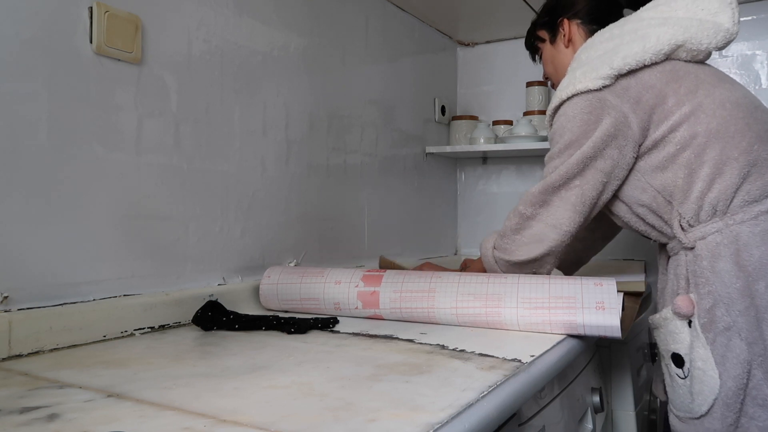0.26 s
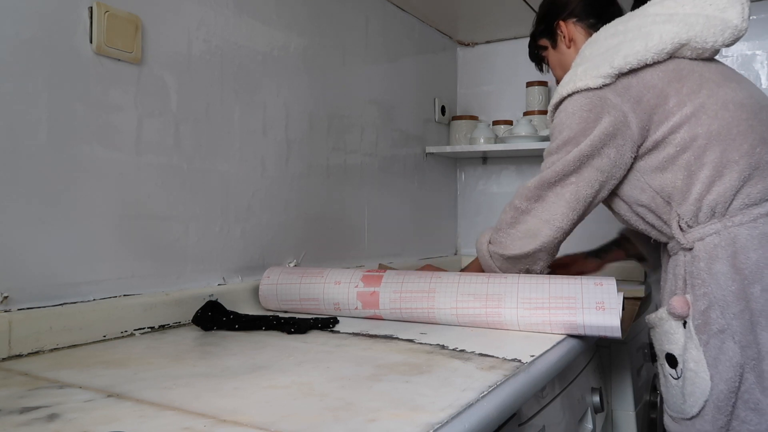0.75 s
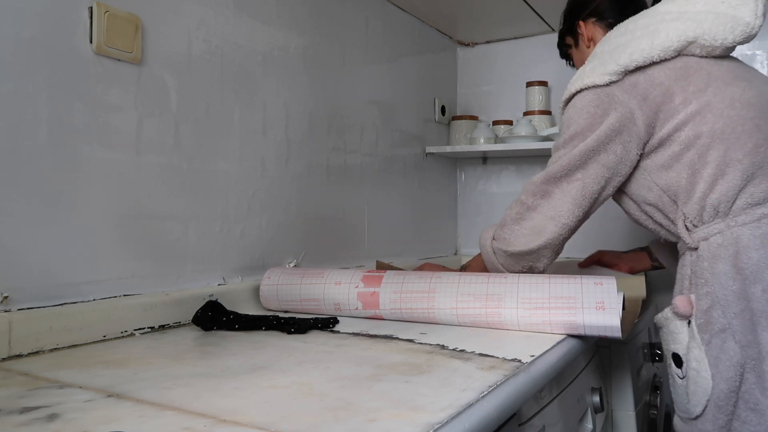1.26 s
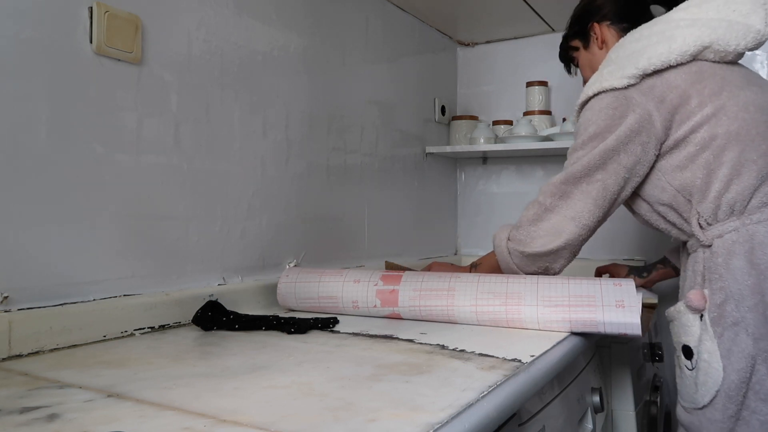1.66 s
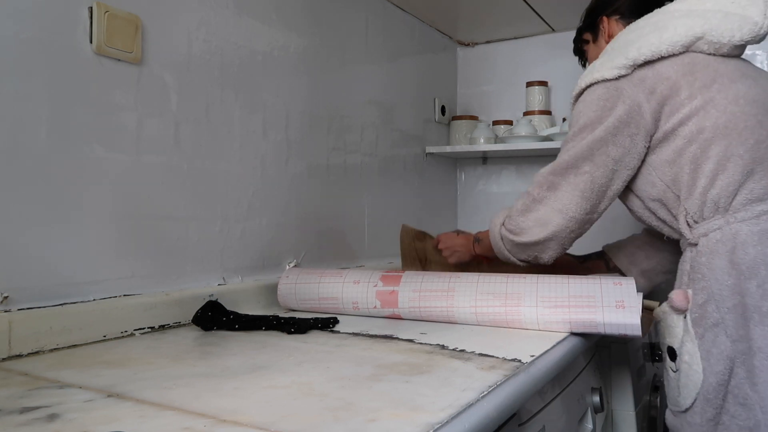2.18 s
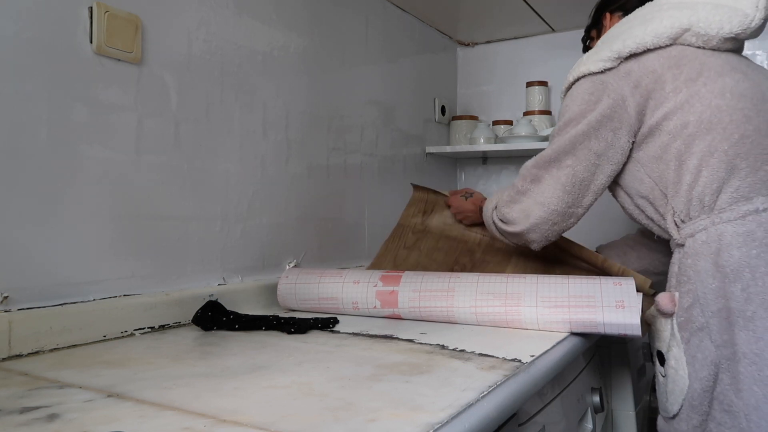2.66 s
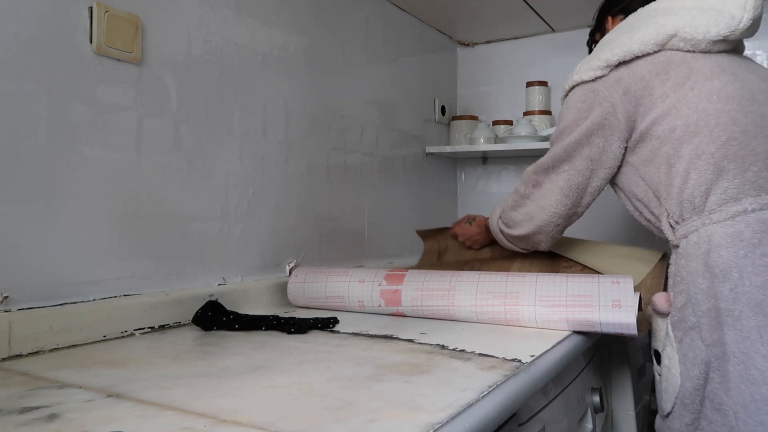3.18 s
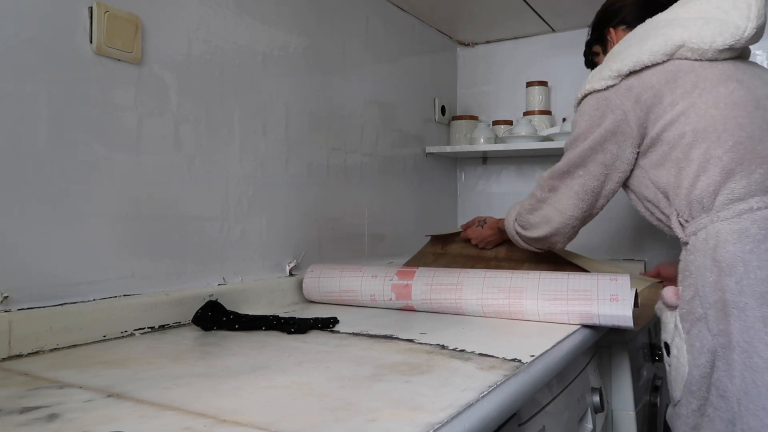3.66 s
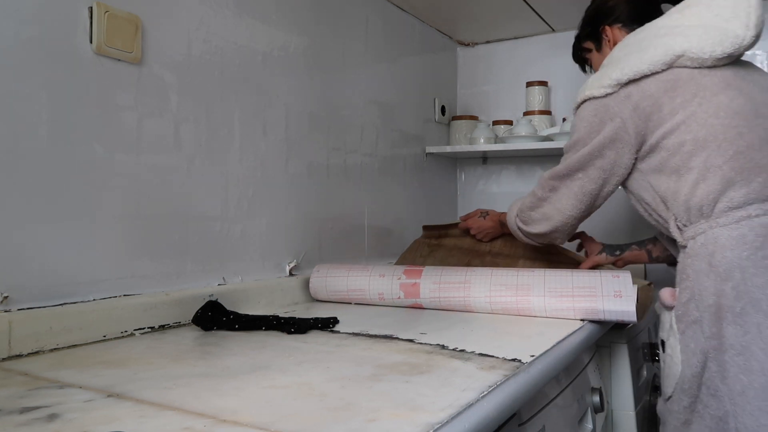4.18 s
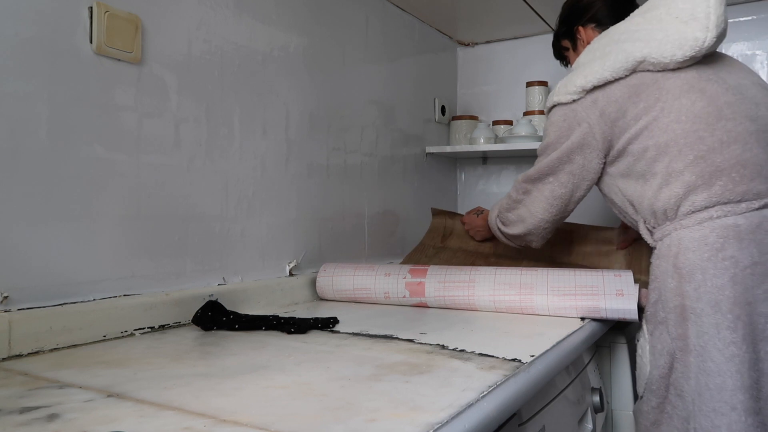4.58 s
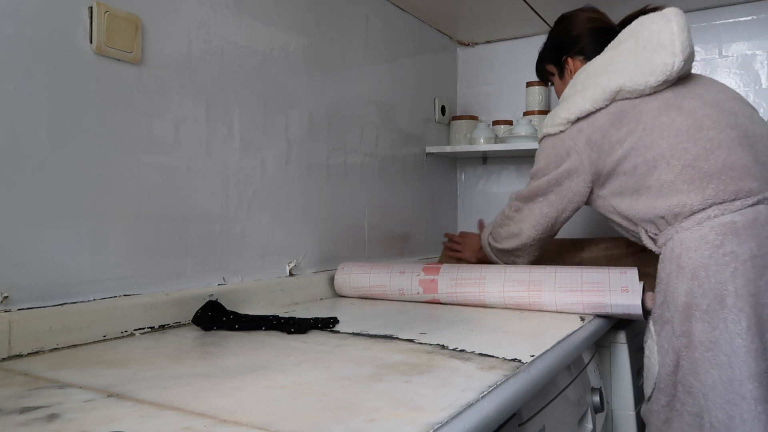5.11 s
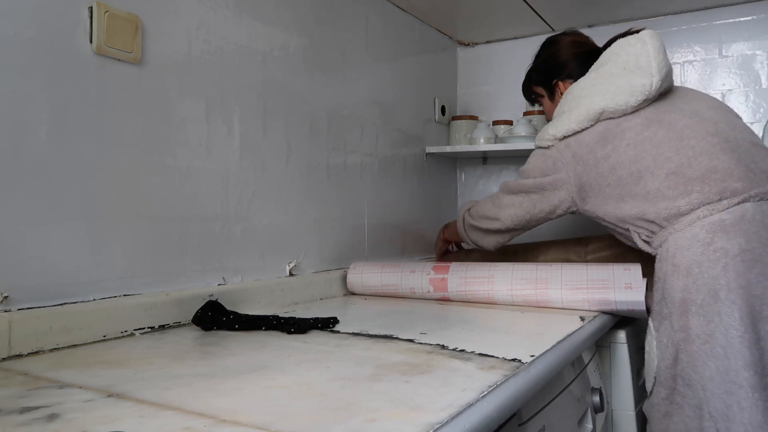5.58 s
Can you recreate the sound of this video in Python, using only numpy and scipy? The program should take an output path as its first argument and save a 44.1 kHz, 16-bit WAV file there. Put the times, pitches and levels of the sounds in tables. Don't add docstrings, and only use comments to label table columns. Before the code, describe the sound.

Stiff film and its paper backing crackle, snap and rustle close by as hands smooth, peel and press them, with soft counter thumps.

```python
import sys
import numpy as np
from scipy import signal
from scipy.fft import rfft, irfft
from scipy.io import wavfile

SR = 44100
rng = np.random.default_rng(int(sys.argv[2]) if len(sys.argv) > 2 else 0)


def to_wav(s):
    ch = np.atleast_2d(s).T
    pcm = np.round(np.clip(ch, -1, 1) * 32767)
    wavfile.write(sys.argv[1], SR, pcm.astype(np.int16))


def voltage_ratio(level):
    return 10 ** (np.asarray(level, float) / 20)


N = 257984


def rms_one(x):
    return x / np.sqrt(np.mean(x ** 2) + 1e-20)


def at_hz(points, hz):
    return np.interp(np.log(hz), np.log(np.array(points)[:, 0] + 1), np.array(points)[:, 1])


def in_time(rows):
    s, *columns = np.transpose(rows)
    return [np.interp(np.arange(N) / SR, s, c) for c in columns]


def drift(rate_hz, at):
    step = 40
    r = np.exp(-2 * np.pi * rate_hz * step / SR)
    white = rng.standard_normal(N // step + 2002)
    slow = signal.lfilter([1], [1, -2 * r, r * r], white)[2000:]
    return np.interp(at / step, np.arange(len(slow)), rms_one(slow))


def ring(clicks, hz, t60_s):
    r, w = voltage_ratio(-60 / (t60_s * SR)), 2 * np.pi * hz / SR
    return signal.lfilter([0, np.sin(w)], [1, -2 * r * np.cos(w), r * r], clicks + 1e-18)


def colour(x, points):
    log_gain = at_hz(points, np.fft.rfftfreq(8192, 1 / SR) + 1) * np.log(10) / 20
    cepstrum = irfft(log_gain)[:4096] * np.r_[1, np.full(4095, 2)]
    response = irfft(np.exp(rfft(cepstrum, 8192)))[:4096]
    return signal.fftconvolve(x, response)[:len(x)]


def band_pass(low_hz, high_hz, x):
    return signal.sosfilt(signal.butter(2, [low_hz, high_hz], "band", fs=SR, output="sos"), x)


def handling():
    # start_s, rise_s, length_s, crackle_db, stiffness (+ crisp film, - soft paper)
    smoothing = [(0.0, 0.0027, 0.0099, -43, 0.1), (0.02, 0.0055, 0.37, -34, 0.015),
                 (0.27, 0.06, 0.17, -32.5, -0.15), (0.499, 0.022, 0.11, -40.5, -0.24),
                 (0.6, 0.02, 0.043, -41, 0.055), (0.764, 0.027, 0.039, -33, 0.2),
                 (0.835, 0.051, 0.075, -37, 0.14), (0.92, 0.026, 0.041, -40, 0.66),
                 (0.97, 0.031, 0.041, -34.5, 0.3), (1.1, 0.018, 0.078, -30.5, 0.33),
                 (1.19, 0.14, 0.3, -26.5, 0.0039), (1.402, 0.0043, 0.15, -26, 0.31),
                 (1.549, 0.068, 0.079, -32.5, 0.077), (1.63, 0.012, 0.051, -37.5, 0.051),
                 (1.747, 0.01, 0.086, -39, 0.24), (1.847, 0.0066, 0.02, -33.5, -0.0016),
                 (1.92, 0.036, 0.051, -48, -0.057), (2.07, 0.029, 0.055, -47, 0.029),
                 (2.119, 0.0017, 0.0042, -38.5, 0.3)]
    peeling = [(2.195, 0.015, 0.075, -42.5, 0.011), (2.25, 0.034, 0.12, -39, -0.2),
               (2.344, 0.0063, 0.039, -35, 0.35), (2.39, 0.012, 0.037, -34, 0.076),
               (2.47, 0.017, 0.1, -34, 0.047), (2.594, 0.0044, 0.038, -35, 0.23),
               (2.695, 0.011, 0.019, -29.5, 0.23), (2.759, 0.0095, 0.059, -38, -0.11),
               (2.834, 0.032, 0.035, -30, -0.043), (2.89, 0.045, 0.067, -34, 0.33),
               (2.97, 0.025, 0.19, -34, -0.11), (3.135, 0.037, 0.14, -34.5, 0.13),
               (3.28, 0.021, 0.11, -34.5, 0.0094), (3.36, 0.08, 0.26, -34, 0.18),
               (3.47, 0.052, 0.11, -34, 0.06), (3.656, 0.037, 0.077, -34, -0.033)]
    pressing = [(3.88, 0.032, 0.12, -43, -0.0065), (4.02, 0.065, 0.3, -40, 0.087),
                (4.274, 0.003, 0.015, -39, -0.13), (4.31, 0.037, 0.11, -43.5, 0.14),
                (4.43, 0.038, 0.062, -40.5, 0.072), (4.567, 0.012, 0.35, -41, -0.039),
                (4.767, 0.02, 0.27, -37, 0.12), (4.999, 0.09, 0.31, -37.5, 0.23),
                (5.22, 0.061, 0.21, -43, 0.31), (5.39, 0.018, 0.15, -42, 0.2),
                (5.559, 0.012, 0.11, -41.5, 0.17), (5.665, 0.017, 0.089, -42, -0.076),
                (5.74, 0.02, 0.048, -42.5, -0.12), (5.45, 0.035, 0.14, -41, -0.32)]
    big_patch_db = [0, 2, 3]
    resting_db = [-80, -47.5, -50]
    sag_db_per_s, release_db_per_s = 25.5, 207
    crisp_gain_db, body_gain_db = 14.5, -23
    flap_follows = 0.35

    t = np.arange(0, N, 32)[:, None] / SR
    kinds = zip((smoothing, peeling, pressing), big_patch_db, resting_db)
    rows = [(*move, *kind) for moves, *kind in kinds for move in moves]
    start, rise, length, db, stiffness, flap_db, rest_db = np.transpose(rows)
    fade_db = sag_db_per_s * (t - start) + release_db_per_s * np.maximum(t - start - length, 0)
    onset = np.clip((t - start) / np.maximum(rise, 0.002), 1e-9, 1)
    power = onset ** 2 * voltage_ratio(2 * (db - np.clip(fade_db, 0, 150)))
    share = power / power.sum(1, keepdims=True)
    total = power.sum(1) + voltage_ratio(2 * share @ rest_db)
    crackle_db = 10 * np.log10(total)
    stiff = power @ stiffness / total
    flap = share @ flap_db - (1 - flap_follows) * crackle_db
    curves = (crackle_db, crisp_gain_db * stiff, body_gain_db * stiff, flap)
    return [np.interp(np.arange(N) / SR, t[:, 0], c) for c in curves]


def cracks(per_s):
    return rng.choice([-1, 1], N) * (rng.random(N) < per_s / SR)


def rustle(per_s, clump_db, cycles):
    # pitch_hz, level_db (per Hz)
    sheet = [(65, -31), (110, 3.5), (255, 5), (493, -7), (593, -89), (698, 0), (990, 2.5), (1350, -0.5),
             (2550, 1.5), (4000, -6), (5220, -14), (8910, -27), (12500, -42), (14900, -43.5)]
    patchy_db, patch_changes_hz = 2.2, 12.

    crackle_db, crisp, body, flap = handling()
    clicks = cracks(per_s * voltage_ratio(clump_db * drift(30., np.arange(N))))
    out = np.zeros(N)
    pitches = np.geomspace(120, 13000, 28)
    dealt = rng.integers(0, 28, N)
    levels = [c - c.mean() for c in (flap, body, 0 * body, crisp)]
    for k, hz in enumerate(pitches):
        at = np.flatnonzero((dealt == k) & (clicks != 0))
        shares = [np.interp(np.log(hz), np.log([300, 900, 2200, 6000]), w) for w in np.eye(4)]
        level_db = crackle_db[at] + sum(w * c[at] for w, c in zip(shares, levels))
        level_db = level_db + patchy_db * drift(patch_changes_hz, at)
        own = np.zeros(N)
        own[at] = rms_one(clicks[at]) * np.sqrt(N / len(at)) * voltage_ratio(level_db)
        patch = ring(ring(own, hz, cycles / hz), hz, cycles / hz)
        even = (hz / SR / cycles) ** 1.5 * np.sqrt(hz)
        out += patch * even * voltage_ratio(at_hz(sheet, hz)) * (-1) ** k
    return voltage_ratio(-4.0) * out


def hum():
    # time_s, pitch_hz, level_db
    motor = [(0.0, 80, -38), (0.17, 82.6, -51.5), (0.3, 81.9, -43.5), (0.6, 86.1, -46), (1.09, 89.9, -43.5),
             (1.25, 86.2, -54), (1.9, 88.6, -48.5), (2.18, 83.8, -61), (2.54, 85.2, -48),
             (2.95, 82.5, -46.5), (3.5, 87.5, -51.5), (3.7, 83, -68), (4.14, 82, -53), (4.64, 82.8, -59),
             (5.39, 89.4, -50.5), (5.57, 83.8, -63), (5.72, 81.7, -41.5), (5.85, 80, -48)]
    # pitch_hz, width_hz, level_db
    upper = [(113.8, 11.4, -4.5), (183.7, 5.4, -5), (250, 310, -10)]

    lines = [voltage_ratio(db) * rms_one(ring(rng.standard_normal(N), hz, 2.8 / width)) for hz, width, db in upper]
    pitch_hz, level_db = in_time(motor)
    at = np.arange(N)
    phase = 2 * np.pi * np.cumsum(pitch_hz + 2.4 * drift(7.0, at)) / SR
    lowest = np.sqrt(2) * np.sin(phase)
    return voltage_ratio(level_db + 2.45 * drift(7.2, at)) * lowest + voltage_ratio(-48.0) * sum(lines)


def air():
    # pitch_hz, level_db (per Hz)
    spectrum = [(25, 10.5), (60, -19), (90, -23), (250, -12), (400, -17), (1000, -12.5), (2500, -22),
                (5000, -32.5), (9000, -43.5), (15000, -49)]
    return voltage_ratio(-43) * rms_one(colour(rng.standard_normal(N), spectrum))


def ticks():
    # start_s, peak_db, centre_hz, dying_s
    creases = [(0.032, -18, 1890, 0.0068), (0.557, -28, 1193, 0.005), (0.604, -22, 1380, 0.0045),
               (0.625, -20, 1320, 0.005), (0.79, -17, 1630, 0.0058), (1.114, -22, 2480, 0.005),
               (1.152, -11, 1760, 0.0045), (1.205, -18.5, 2450, 0.005), (1.246, -13.5, 1830, 0.0057),
               (1.313, -21, 1810, 0.005), (1.406, -12, 2050, 0.005), (1.493, -14, 2180, 0.005),
               (1.539, -18, 1270, 0.0058), (1.854, -16.5, 1560, 0.0044), (2.12, -14.5, 2050, 0.0047),
               (2.354, -21.5, 2580, 0.0057), (2.523, -19, 2380, 0.005), (2.604, -18, 2610, 0.0051),
               (2.7, -20, 2890, 0.0056), (2.87, -14, 1730, 0.006), (2.999, -19, 1850, 0.005),
               (3.012, -22.5, 3090, 0.0045), (3.067, -27, 2500, 0.0054), (3.104, -20, 1820, 0.006),
               (3.174, -28, 2270, 0.0042), (3.309, -14, 1540, 0.0055), (3.427, -25, 2020, 0.005),
               (3.538, -16, 1890, 0.0062), (3.706, -24, 2410, 0.0047), (4.279, -20, 1530, 0.0054),
               (4.483, -27, 2300, 0.0055), (4.621, -41, 2470, 0.0054), (4.68, -30, 2500, 0.0044),
               (4.827, -30, 3050, 0.0044), (4.912, -29, 2390, 0.005), (5.095, -23, 1780, 0.0039),
               (5.404, -27, 1240, 0.005), (5.57, -22.5, 1720, 0.0052)]
    half_width = 2 ** 0.8

    out, t = np.zeros(N + SR), np.arange(SR // 20) / SR
    white, lumps = rng.standard_normal((len(creases), 2, len(t))).transpose(1, 0, 2)
    for (s, peak_db, hz, dying), burst in zip(creases, white * voltage_ratio(2.7 * lumps)):
        crack = rms_one(band_pass(hz / half_width, hz * half_width, burst))
        crack = crack * np.exp(-t / max(dying, 0.001)) * np.minimum(t / 0.0019, 1)
        out[round(s * SR):][:len(t)] += voltage_ratio(peak_db - 9.5) * crack
    return out[:N]


def snaps():
    # start_s, peak_db, pitch_hz, crispness_db
    film_snaps = [(0.033, -20.5, 1920, -10), (0.073, -22, 2480, -15), (0.189, -21, 2900, 0),
                  (0.379, -19, 2570, -25), (0.401, -32, 980, -36), (0.429, -29, 2080, -13),
                  (0.556, -34, 1963, -18), (0.625, -28, 2600, -11), (0.79, -16, 1710, -35),
                  (0.88, -25.5, 2660, 10), (0.94, -27, 2900, 10), (0.998, -20.5, 2570, -5),
                  (1.125, -24, 2540, -14), (1.155, -11.5, 2050, -1), (1.274, -19, 1900, -27),
                  (1.386, -36, 2550, -19), (1.407, -7.5, 2160, -16), (1.537, -33, 1244, -29),
                  (1.636, -16.5, 2130, -23), (1.853, -40, 1780, -33), (2.121, -37, 2970, 0.6),
                  (2.127, -18.5, 1220, -41), (2.312, -30, 2170, -23), (2.353, -16, 3040, -29),
                  (2.406, -22, 920, -13), (2.524, -13.5, 2380, -3), (2.61, -22, 2600, 9),
                  (2.699, -29, 2800, -5), (2.761, -26, 2200, -10), (2.833, -25, 1926, -7),
                  (2.917, -20, 983, -19), (3.094, -30, 1010, 6), (3.511, -40, 2870, -18),
                  (3.709, -24, 2430, -4), (4.038, -33, 2590, -13), (4.279, -31, 1620, -25),
                  (4.339, -27, 2200, -29), (4.585, -37, 1800, -12), (4.719, -28, 2460, -16),
                  (4.623, -24, 1190, -36), (5.0953, -22, 1810, -24), (5.161, -31, 2780, 1),
                  (5.596, -24.5, 3070, -9)]
    # start_s, peak_db, pitch_hz
    paper_snaps = [(0.213, -18, 2100), (0.336, -16.5, 1270), (0.516, -25.5, 1140), (0.602, -22.5, 1440),
                   (0.776, -38, 1600), (0.847, -22, 2500), (1.113, -18, 2710), (1.204, -14.5, 2800),
                   (1.246, -20, 1910), (1.318, -13.5, 1970), (1.453, -11, 2130), (1.491, -12, 2230),
                   (3.59, -21.5, 1020), (2.488, -25, 2050), (2.872, -21.5, 1100), (2.999, -20, 737),
                   (3.005, -22, 1870), (3.243, -19.5, 1890), (3.308, -18, 1506), (3.325, -16, 725),
                   (3.53, -25, 1870), (3.692, -40, 1780), (3.916, -42, 770), (4.157, -24, 2110),
                   (4.481, -25.5, 920), (4.683, -25, 900), (4.82, -22.5, 1480), (5.399, -25.5, 766),
                   (5.568, -15, 1070), (5.67, -23.5, 1150)]
    # rise_s, length_s, first_crack_db
    film = (0.0007, 0.009, 0.)
    paper = (0.0042, 0.02, 4.4)
    paper_crisp_db = -94

    out, t = np.zeros(N + SR), np.arange(SR // 8) / SR
    rows = [(*snap, *film) for snap in film_snaps]
    rows += [(*snap, paper_crisp_db, *paper) for snap in paper_snaps]
    white, lumps = rng.standard_normal((len(rows), 2, len(t))).transpose(1, 0, 2)
    grit = white * voltage_ratio(3.6 * lumps)
    for (s, peak_db, hz, crisp_db, rise, length, crack_db), burst in zip(rows, grit):
        swell = 1 - np.exp(-t / max(rise, 0.0005))
        burst = rms_one(burst) * swell * np.exp(-t / max(length, 0.002))
        burst[int(0.001 * SR)] += voltage_ratio(crack_db + 12)
        tone = ring(burst, hz, 11.0 / hz) * np.sqrt(hz / SR) * voltage_ratio(-9)
        crunch = band_pass(700, 4200, burst) * voltage_ratio(-10.5)
        bright = band_pass(2900, 6200, burst) * voltage_ratio(0.5 * crisp_db - 13.0)
        out[round(s * SR):][:len(t)] += voltage_ratio(peak_db) * (tone + crunch + bright)
    return signal.sosfilt(signal.butter(2, 8000, fs=SR, output="sos"), out[:N])


def thumps():
    # start_s, peak_db, pitch_hz, ring_s
    blows = [(2.214, -55, 178, 0.055), (2.269, -30, 190, 0.069), (2.5, -30.5, 132, 0.21),
             (2.703, -24, 237, 0.05), (2.795, -28.5, 264, 0.17), (2.867, -21, 179, 0.061),
             (2.997, -19.5, 400, 0.075), (3.298, -23.5, 184, 0.21), (3.327, -18, 225, 0.056),
             (3.589, -19.5, 188, 0.064), (3.698, -34, 174, 0.17), (3.913, -26, 190, 0.067),
             (4.151, -34.5, 177, 0.16), (4.279, -40, 181, 0.1), (4.617, -26, 200, 0.069),
             (4.786, -21, 115, 0.11), (4.805, -14, 214, 0.1), (4.8, -23, 544, 0.057),
             (4.816, -21, 240, 0.058), (4.868, -33, 114.6, 0.073), (5.092, -17.5, 250, 0.043),
             (5.561, -27.5, 250, 0.077), (5.674, -32, 210.5, 0.27), (5.709, -43, 92.3, 0.069),
             (5.749, -26, 224.6, 0.1)]
    # pitch_hz, level_db
    counter = [(112, 2), (172, 2.5), (246, 0), (395, -4), (535, 3.5)]

    out, t = np.zeros(N + SR), np.arange(SR // 2) / SR
    chance = rng.standard_normal((len(blows), len(counter)))
    for (s, peak_db, pitch_hz, t60), uneven in zip(blows, chance):
        sound = voltage_ratio(-4) * np.sin(2 * np.pi * pitch_hz * t)
        for (hz, level_db), u in zip(counter, uneven):
            octaves_off = abs(np.log2(hz / pitch_hz))
            mode_db = level_db - 7 * octaves_off - 2.5 + 2.9 * u
            sound = sound + voltage_ratio(mode_db) * np.sin(2 * np.pi * hz * t)
        decay = voltage_ratio(peak_db - 60 * t / max(t60, 0.02) - 2.5)
        out[round(s * SR):][:len(t)] += decay * (1 - np.exp(-t / 0.0096)) * sound
    return out[:N]


def knocks():
    # start_s, peak_db
    knuckles = [(2.872, -23.5), (2.913, -22), (5.14, -25), (5.405, -33), (5.47, -41), (5.495, -30),
                (5.531, -33), (5.569, -11), (5.61, -33)]
    # pitch_hz, level_db, t60_s
    roll = [(694, -3, 0.14), (920, 2, 0.036), (970, -0.5, 0.13), (1030, -26, 0.084)]

    at = [round(s * SR) for s, db in knuckles]
    out = np.zeros(N)
    chance = rng.standard_normal((len(knuckles), len(roll)))
    for (hz, level_db, t60), uneven in zip(roll, chance.T):
        clicks = np.zeros(N)
        clicks[at] = voltage_ratio(np.array(knuckles)[:, 1] + level_db - 13.5 + 0.39 * uneven)
        out += ring(clicks, hz, t60)
    return band_pass(500, 1300, out)


def kitchen(x, scattered, count):
    t60_s, treble_t60_s, tail_db = 0.18, 0.21, -5
    t, place, out = np.arange(SR // 3) / SR, np.linspace(0, count - 1, N), np.zeros(N)
    for k in range(count):
        noise = rng.standard_normal(len(t))
        first = 1. * (t == 0)
        if scattered:
            first = np.pad(irfft(np.exp(2j * np.pi * rng.random(49))), (0, len(t) - 96))
        dull = signal.sosfilt(signal.butter(1, 2500, fs=SR, output="sos"), noise)
        tail = dull * voltage_ratio(-60 * t / t60_s) + (noise - dull) * voltage_ratio(-60 * t / treble_t60_s)
        tail = tail * (1 - np.exp(-(t / 0.0003) ** 2))
        path = first / np.sqrt(np.sum(first ** 2)) + voltage_ratio(tail_db) * tail / np.sqrt(np.sum(tail ** 2))
        here = np.flatnonzero(abs(place - k) < 1)
        fade = np.cos(np.pi / 2 * (place[here] - k))
        echo = signal.fftconvolve(x[here] * fade, path)
        out[here[0]:here[0] + len(echo)] += echo[:N - here[0]]
    return out


def scene():
    # pitch_hz, difference_minus_sum_db
    width = [(60, -30), (150, -18.5), (330, -9), (600, -13.5), (1000, -20.5), (2000, -20.5), (3300, -15),
             (3900, -4.5), (5500, -0.5), (8000, 2.5), (10000, 10), (14400, 12)]
    near = rustle(per_s=14000., clump_db=1.5, cycles=5.74) + snaps() + thumps() + knocks() + ticks()
    mid = kitchen(near, scattered=False, count=18) + air() + hum()
    side_air = voltage_ratio(3.5) * colour(air(), [(100, 2.0), (3000, 3.0), (6000, -6), (14000, -7)])
    side = colour(kitchen(near, scattered=True, count=100) + side_air + hum(), width)
    return np.array([mid + side, mid - side])


def band_limit(x):
    return signal.sosfilt(signal.butter(12, 15040, fs=SR, output="sos"), x)


def record(dry):
    cut = signal.sosfilt(signal.butter(2, 70, "high", fs=SR, output="sos"), dry)
    return band_limit(cut)


dry = scene()
out = record(dry)
to_wav(out)
```